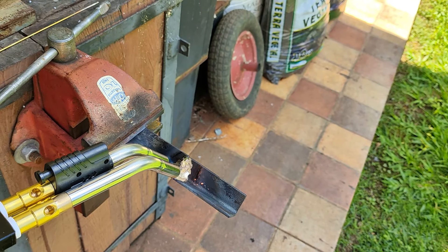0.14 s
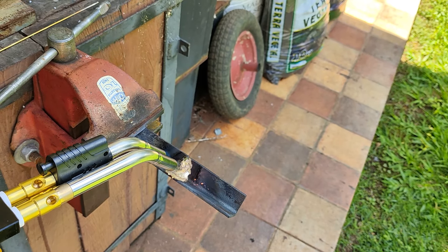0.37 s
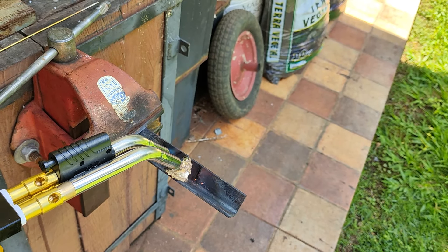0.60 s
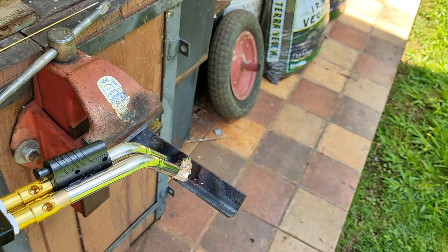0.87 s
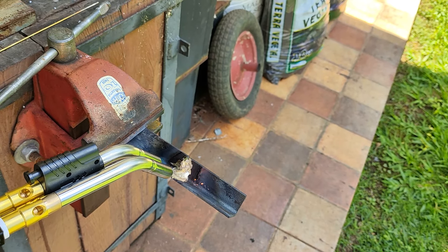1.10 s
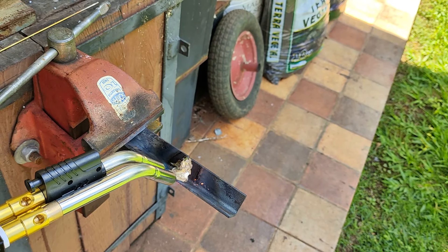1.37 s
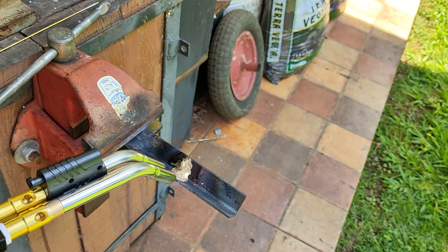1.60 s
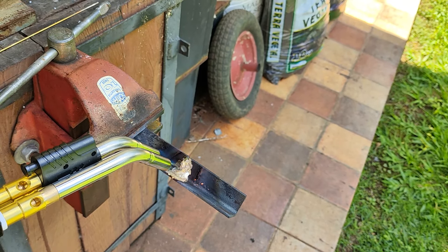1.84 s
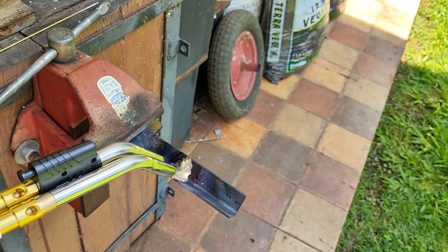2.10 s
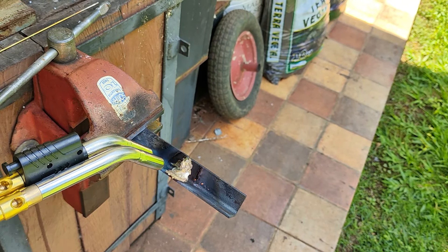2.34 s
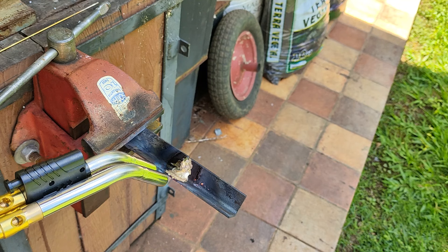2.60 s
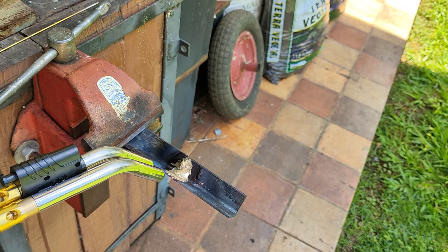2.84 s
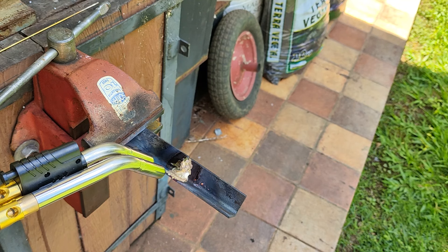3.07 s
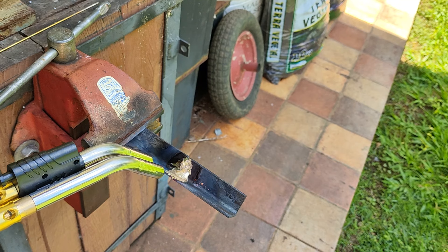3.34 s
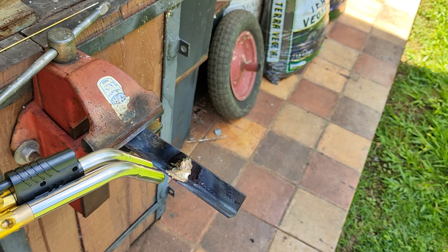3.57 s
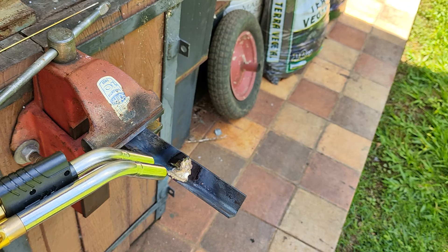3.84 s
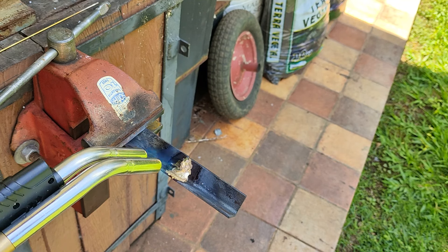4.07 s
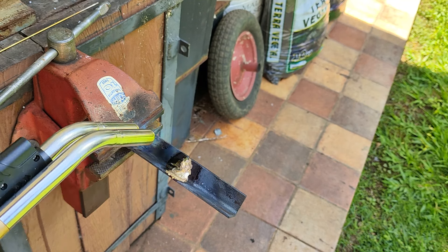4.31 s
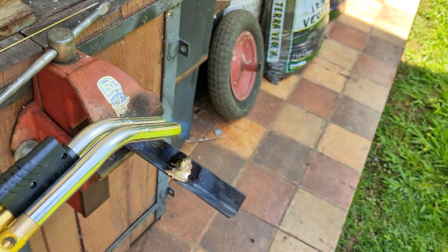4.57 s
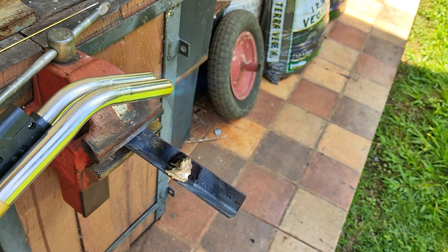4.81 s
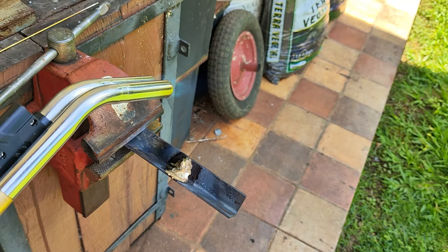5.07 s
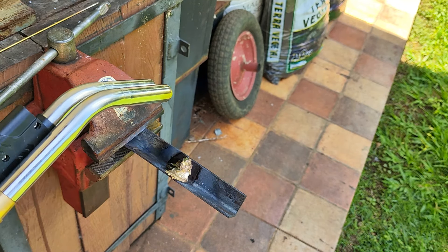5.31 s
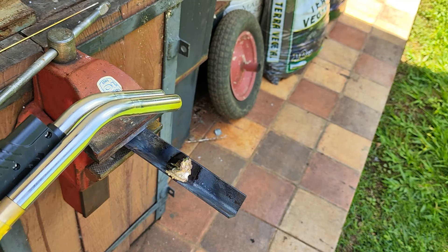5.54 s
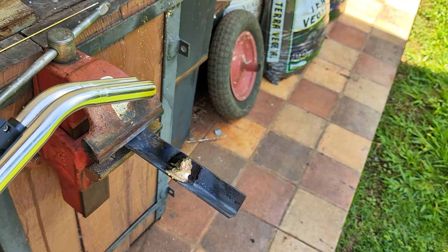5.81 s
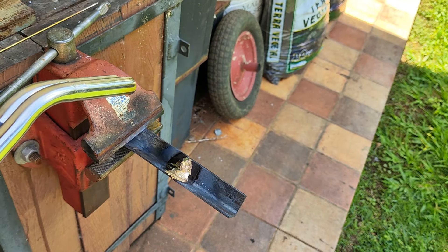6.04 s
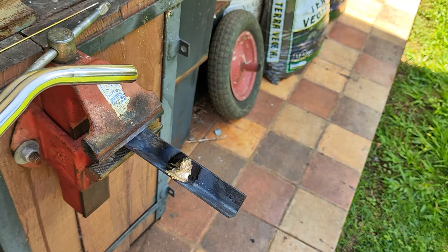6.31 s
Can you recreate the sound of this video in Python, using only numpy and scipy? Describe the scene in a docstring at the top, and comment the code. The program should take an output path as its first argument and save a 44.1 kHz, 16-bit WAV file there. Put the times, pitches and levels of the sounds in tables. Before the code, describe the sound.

From 0 s a gas torch is already burning close to a handheld stereo microphone outdoors: a loud, dense rush made of low turbulent roar, a hollow howl around 1 to 1.5 kHz, and bright jet hiss with flickering fizz. It flutters quickly but stays continuous. In the first second the treble and balance shift noticeably as the hand steers it; around 2 s the howl sinks a little, then climbs again after 3 s. Close hard surfaces give a comb-like, metallic colour that changes with movement. Near 4.1 s, as the torch lifts, a brief lower howl swells. At 5.2 s the valve closes and the flame drops away rapidly. A light, hollow ringing pop sounds at 5.4 s, a stronger thump with a metallic click at 5.65 s, with faint short reflections. Until about 6.4 s only soft distant hum, air, microphone hiss and a few tiny ticks remain.

```python
"""A gas flame roars and howls and its jet hisses: bands of fluttering noise, with a narrow wandering core in the howl.
A twin-tube torch burns close to a handheld two-port microphone, aimed at a steel bar in a vice by a shed door.
Near surfaces echo it, as delayed copies that shift with the moving torch; far walls add a faint noise tail.
The valve closes and each tube pops as its flame dies: decaying sines, a gliding ring and puffs of noise.
A quiet yard of hum, air and hiss, there all along, is left with a few faint ticks of filtered noise."""
import sys
import numpy as np
from scipy import signal
from scipy.fft import rfft, irfft, next_fast_len
from scipy.io import wavfile
from scipy.ndimage import uniform_filter1d, map_coordinates

SR = 44100
rng = np.random.default_rng(int(sys.argv[2]) if len(sys.argv) > 2 else 0)


def output_pcm(signal):
    """Save a mono or channel-first signal as 16-bit PCM at the path in sys.argv[1].

    Samples are clipped to [-1, 1] before scaling.
    """
    pcm = np.clip(np.atleast_2d(signal).T, -1, 1) * 32767
    wavfile.write(sys.argv[1], SR, np.round(pcm).astype(np.int16))


def attenuation_scalar(level_db):
    """Turn a level in dB into a linear amplitude multiplier (20 dB per decade)."""
    decades = np.asarray(level_db, float) / 20
    return 10 ** decades


N = 283122  # samples


def unit(x):
    """Scales to rms 1."""
    return x / np.sqrt(np.mean(x ** 2) + 1e-20)


def along(points, hz):
    """Reads (frequency [Hz], value) points on a log frequency axis."""
    f, v = np.transpose(points)
    return np.interp(np.log(hz + 1), np.log(f + 1), v)


def curves(rows):
    """One value per sample for each column after the time."""
    s, *columns = np.transpose(rows)
    return [np.interp(np.arange(N) / SR, s, c) for c in columns]


def wobble(rate):
    """A smooth random curve with rate knots a second."""
    knots = rng.standard_normal(int(N * rate / SR) + 4)
    return map_coordinates(knots, [np.arange(N) * rate / SR])


def smooth(x, *sizes):
    """Running means, one after another, along the last axis."""
    for size in sizes:
        x = uniform_filter1d(x, size)
    return x


def filtered(x, response):
    """Multiplies the spectrum of x by a complex response of frequency."""
    m = next_fast_len(N + 8192)
    return irfft(rfft(x, m) * response(np.fft.rfftfreq(m, 1 / SR)), m)[..., :N]


def rush(spectrum, alike, patchy_db):
    """Stereo noise of rms 1, partly shared by the ports, with eddies of random gain."""
    z = signal.stft(rng.standard_normal((2, N)), nperseg=512)[2]
    field = uniform_filter1d(rng.standard_normal(z.shape[1:]), size=3, axis=0)
    eddies = unit(uniform_filter1d(field, size=16, axis=1))
    pair = signal.istft(z * attenuation_scalar(patchy_db * eddies), nperseg=512)[1][:, :N]

    def mid_side(hz):
        turn = np.arccos(np.clip(along(alike, hz), -1, 1)) / 2  # sets the left-right likeness
        return attenuation_scalar(along(spectrum, hz)) * [np.cos(turn), np.sin(turn)]

    mid, side = filtered(pair, mid_side)
    return unit(np.array([mid + side, mid - side]))


def hiss():
    """The microphone's own hiss, nearly unrelated between the ports."""
    spectrum = [(7000, -39.0), (7600, -1.5), (11000, -0.5), (14300, 2.0)]  # (frequency [Hz], density [dB])
    return attenuation_scalar(-81.5) * rush(spectrum, [(1000, 0.0049)], patchy_db=2.0)


# likeness of the yard at the two ports: (frequency [Hz], left-right correlation)
YARD_ALIKE = [(60, .77), (290, .64), (640, .15), (1400, 0)]
# distant hum: (frequency [Hz], density [dB per Hz])
HUM = [(15, -45), (25, -24), (42, -14.5), (70, -6), (81, -7.5), (143, -6), (261, -4.5), (431, -21),
       (600, -41.5)]


def hum():
    """A low distant hum that wavers in level."""
    return attenuation_scalar(-64.5 + 2 * wobble(5)) * rush(HUM, YARD_ALIKE, patchy_db=1.7)


# far rush of air: (frequency [Hz], density [dB per Hz])
AIR = [(250, -30), (431, -2.5), (522, 0.5), (783, -0.5), (1900, -4), (2800, -5.5), (4000, -9.5),
       (5000, -16), (7600, -24), (9880, -51), (16700, -100)]


def air():
    """A nearly steady far rush of air."""
    return attenuation_scalar(-71.5 + 0.3 * wobble(8)) * rush(AIR, YARD_ALIKE, patchy_db=0.2)


def yard():
    """The quiet bed: distant hum, far air and microphone hiss added together."""
    return hum() + air() + hiss()


# faint ticks: (time [s], onset level ahead of the soft attack [dB], nominal pitch [Hz], t60 [s])
TICKS = [(5.478, -61.5, 2800, .08), (5.479, -64, 12000, .07), (5.8721, -60.5, 2400, .04),
         (5.9185, -63, 2700, .02), (5.919, -59, 10500, .014), (6.19, -71, 10000, .09)]


def ticks():
    """Brief puffs of noise in a wide band around a nominal pitch, with a soft attack and a quick decay."""
    out, t = np.zeros((2, N + SR)), np.arange(SR // 10) / SR
    for s, db, hz, t60 in TICKS:
        band = signal.butter(2, [hz * 0.45, hz * 1.8], "band", fs=SR)
        puff = unit(signal.lfilter(*band, rng.standard_normal((2, len(t)))))
        envelope = attenuation_scalar(db - 60 * t / t60) * (1 - np.exp(-t / 0.0015))
        out[:, round(s * SR):][:, :len(t)] += envelope * puff
    return out[:, :N]


# far walls of the yard: (frequency [Hz], t60 [s])
WALLS = [(300, .35), (1000, 0.59), (1300, 0.48), (1470, 0.72), (1650, .55), (2100, 0.7), (2800, .6),
         (4000, 0.37), (10000, 0.31)]


def walls(x):
    """Far walls: convolution with a noise tail in which each frequency dies at its own speed."""
    hz, t, z = signal.stft(rng.standard_normal((2, SR * 3 // 4)), SR, nperseg=256)
    decay = attenuation_scalar(-60 * t / along(WALLS, hz)[:, None])
    tail = signal.istft(z * decay, SR, nperseg=256)[1]
    return signal.fftconvolve(x, tail / np.linalg.norm(tail[0]), axes=1)[:, :N]


# flames dying in the tubes: (time [s], thump level [dB], ring level [dB],
# pitch the ring climbs towards before it sinks [Hz], ring length [s])
POPS = [(5.381, -54, -39.5, 1110, .029), (5.6516, -28.5, -36.5, 1275, .02)]
# modes of the thump: (frequency [Hz], level in the thump [dB], t60 [s])
THUMP = [(125, -12, .07), (193, 0.5, 0.054), (304, 0.5, 0.035), (433, -5, 0.022), (500, -14, 0.03),
         (650, -12, .025), (855, -14, .02)]
# metallic modes of the click: (frequency [Hz], level in the click [dB], t60 [s])
TUBE = [(1726, -3, .03), (2000, -4, .025), (2300, -4, .025), (2570, 9, .03), (2680, -5, .04),
        (4110, 2, .03), (4380, -4, 0.049), (4620, -11, .04), (5560, -17, .025)]
COOL_HZ = 1085  # where the ring settles
CLICK_DB, CRACK_DB = -21.5, -23  # relative to the thump
CATCH = 1.2  # the ring starts flat by this share of its later fall
LINGER_DB, LINGER_S = -19, 0.053  # faint last part of the ring


def modes(table, t, rise_s):
    """Decaying sines that swell in together."""
    tones = sum(attenuation_scalar(db - 60 * t / t60) * np.sin(2 * np.pi * hz * t) for hz, db, t60 in table)
    return tones * (1 - np.exp(-t / rise_s)) ** 2


def pops():
    """The flame is sucked back with a thump; the tube clicks and its air column rings, sinking as it cools."""
    out, t = np.zeros(N + SR), np.arange(SR // 5) / SR
    late = np.maximum(t - 0.0016, 0)  # click, ring and crack follow the first suck of air
    for s, thump_db, ring_db, ring_hz, ring_s in POPS:
        cooling = 1 / (1 + (late / 0.027) ** 3)
        pitch = COOL_HZ + (ring_hz - COOL_HZ) * (cooling - CATCH * np.exp(-late / 0.0037))
        fade = np.exp(-(late / ring_s) ** 2.4) + attenuation_scalar(LINGER_DB) * np.exp(-(late / LINGER_S) ** 6)
        swell = (1 - np.exp(-late / 0.0052)) * fade
        ring = attenuation_scalar(ring_db) * swell * np.sin(2 * np.pi * np.cumsum(pitch) / SR)
        rough = 1 + 1.6 * smooth(rng.standard_normal(len(t)), 40)
        click = attenuation_scalar(thump_db + CLICK_DB) * modes(TUBE, late, 0.00086) * rough
        puff = unit(smooth(rng.standard_normal(len(t)), 12, 9)) * (1 - np.exp(-late / 0.001))
        crack = attenuation_scalar(thump_db + CRACK_DB - 60 * late / 0.035) * puff
        thump = -attenuation_scalar(thump_db) * modes(THUMP, t, 0.003)  # first motion is inward
        out[round(s * SR):][:len(t)] += ring + click + crack + thump
    return np.tile(out[:N], (2, 1))


# the howl briefly sings low as the torch swings up:
# (time [s], half length [s], centre [Hz], half width [Hz], level [dB])
SURGE = (4.115, .05, 1040, 100, -27)


def surge():
    """A short swell of narrow noise."""
    s, half, centre_hz, width_hz, db = SURGE
    tone = filtered(rng.standard_normal(N), lambda hz: np.exp(-((hz - centre_hz) / width_hz) ** 2))
    return attenuation_scalar(db) * np.exp(-((np.arange(N) / SR - s) / half) ** 2) * unit(tone)


# likeness of the flame at the two ports: (frequency [Hz], left-right correlation)
SHARED = [(30, 0.4), (70, .9), (130, 1), (250, 1), (900, 1), (1500, 0.88), (3000, 0.86), (4200, 0.63),
          (5000, .55), (7000, 0.37), (14000, 0.17)]


def burning(spectrum, patchy_db):
    """Noise of the burning gas, most alike at the two ports in the low mids."""
    return rush(spectrum, SHARED, patchy_db)


# burning gas: (frequency [Hz], density [dB per Hz])
ROAR = [(20, -56), (60, -34.5), (100, -14.5), (140, -4.5), (200, -0.5), (300, 0.5), (420, -11),
        (600, -36.5)]


def roar(db, flutter):
    """Low turbulent roar of the burning gas."""
    gain_db = db + 0.5 * flutter + 0.84 * wobble(30) + 0.6 * wobble(3)
    return attenuation_scalar(gain_db) * burning(ROAR, -0.27)


# flame body: (frequency [Hz], density [dB per Hz])
BODY = [(300, -43), (420, -8.5), (650, -1), (900, -1), (1050, -15.5), (1300, -41.5)]


def body(db, flutter):
    """Mid-range body of the flame, with a slow sway."""
    gain_db = db + 0.86 * flutter + 0.6 * wobble(20) + 1.3 * wobble(3)
    return attenuation_scalar(gain_db) * burning(BODY, 0.55)


# the tightest band of the howl wanders with the torch: (time [s], centre [Hz], level over the howl noise [dB])
CORE = [(0, 1400, -7.5), (.5, 1400, -6.5), (.7, 1380, -10), (.95, 1398, -4), (1.3, 1333, -8),
        (1.7, 1303, -6.5), (2.0, 1181, -7), (2.4, 1229, -8), (2.75, 1246, -6), (3.0, 1398, -3.5),
        (3.4, 1478, -11), (3.9, 1582, -7), (4.05, 1398, -9), (4.3, 1482, -5), (4.6, 1420, -4),
        (4.9, 1400, -2), (5.2, 1380, -2.5)]
CORE_WIDE_HZ, CORE_WAVERS_HZ, CORE_SURGES_DB = 70, 80, 3


def core():
    """Narrow noise whose centre slides and wavers, in short surges."""
    centre_hz, db = curves(CORE)
    a, b = filtered(rng.standard_normal((2, N)), lambda hz: 1 / (1 + (hz / CORE_WIDE_HZ) ** 2))
    turn = 2 * np.pi * np.cumsum(centre_hz + CORE_WAVERS_HZ * wobble(9)) / SR
    return attenuation_scalar(db + CORE_SURGES_DB * wobble(14)) * unit(a * np.cos(turn) + b * np.sin(turn))


# hot tubes: (frequency [Hz], density [dB per Hz])
HOWL = [(700, -46), (900, -14), (1020, -4), (1150, -5.5), (1400, 0), (1750, -10), (2300, -35.5)]


def howl(db, flutter):
    """Howl of the hot tubes: a broad band of noise around a narrow core."""
    gain_db = db - 1.1 + 1.1 * flutter + 0.69 * wobble(18)
    return attenuation_scalar(gain_db) * (burning(HOWL, 1.0) + core())


# gas jet: (frequency [Hz], density [dB per Hz])
JET = [(1400, -35), (1750, 0), (2000, 0), (2300, 0), (3000, -3), (3700, -2), (4150, -3.5), (4450, -11.5),
       (5000, -10.5), (5400, -20), (6000, -37)]


def jet(db, flutter):
    """Upper-mid hiss of the gas jet."""
    return attenuation_scalar(db + 0.61 * flutter + 0.42 * wobble(16)) * burning(JET, 2.0)


# treble of the jet: (frequency [Hz], density [dB per Hz])
FIZZ = [(4800, -30), (5500, 1.5), (6500, 1), (7600, 0.5), (9400, -4.5), (10500, -8), (11300, -4.5),
        (12000, -1), (14300, -4)]


def fizz(db, flutter):
    """Treble fizz of the jet, flickering at several speeds."""
    gain_db = db + 0.77 * flutter + 0.47 * wobble(60) + 1.0 * wobble(7) + 0.36 * wobble(16)
    return attenuation_scalar(gain_db) * burning(FIZZ, 3.0)


# how each part answers: (level before its trims [dB], per dB of bearing [dB], per dB of facing [dB],
# per dB of gas flow [dB], per ms of retreat [dB], time over which it averages the flow [s])
PARTS = {"roar": (-34, 0.17, -0.01, .84, -2.5, 0.09), "body": (-35, 0.4, -0.05, 1.0, 8, 0.07),
         "howl": (-26, 0.98, .01, 1.25, -0.2, 0.035), "jet": (-30.5, 0.15, 0.42, 1.15, 6, 0.03),
         "fizz": (-39.8, 0.25, 1.05, .92, 0, .045)}


def levels():
    """The dB curve of each part, from hand and valve; the big slow flame averages the flow of its recent past."""
    (bearing_db, facing_db, _), back_ms = curves(HAND), curves(POSES)[0]
    t, summed = np.arange(N) / SR, np.cumsum(curves(VALVE)[0]) / SR
    out = []
    for db, bears, faces, flows, opens, slow_s in PARTS.values():
        flow_db = (summed - np.interp(t - slow_s, t, summed)) / slow_s
        out.append(db + bears * bearing_db + faces * facing_db + opens * back_ms + flows * flow_db)
    return out


# the hand steers the flame: (time [s], how hard it bears on the bar [dB],
# how far the nozzle faces the ports [dB], lean of the jet to the left, ahead of its 0.8 scaling [dB])
HAND = [(0, 0, -4.5, 0), (.26, 0, 0, 1.5), (.45, -2, -3.5, -5.5), (.54, 1.5, -1, -5), (.62, -4.5, -5, -4.5),
        (.72, -3, -8, -5.5), (.8, 1, -2, -4), (.95, 1, -0.5, -2.5), (1.1, 2, 1, -1.5),
        (1.45, 1, -1.5, -1.5), (2.0, 0, -1.5, -1), (2.2, .5, 0.5, -2.5), (2.5, 0.5, 0.5, -1.5),
        (2.95, -1, 0, 1.5), (3.4, -0.5, 2.5, 0.5), (3.6, -.5, -1.5, -0.5), (4.02, -1, 2.5, -1),
        (4.17, -1.5, 0.5, -1.5), (4.5, -0.5, 2, -.5), (4.7, 1, -0.5, -0.5), (4.9, 2, -1, -1.5),
        (5.18, -1, -1, 0.5)]
# the valve closes: (time [s], gas flow [dB])
VALVE = [(5.2, 0), (5.275, -4.5), (5.305, -8.5), (5.332, -19), (5.375, -29), (5.41, -35), (5.45, -50),
         (5.6, -85)]


def flame():
    """Turbulent burning: all parts flutter together, each also on its own."""
    roar_db, body_db, howl_db, jet_db, fizz_db = levels()
    flutter = 0.6 * wobble(11) + 0.2 * wobble(23.72) + 0.5 * wobble(150)
    lean = attenuation_scalar(np.outer([0.4, -0.4], curves(HAND)[-1]))
    hot = roar(roar_db, flutter) + body(body_db, flutter) + howl(howl_db, flutter)
    gas = lean * (jet(jet_db, flutter) + fizz(fizz_db, flutter))
    lit = np.arange(N) < VALVE[-1][0] * SR
    return lit * (hot + gas)


# shading by the casing: (frequency [Hz], right over left [dB])
RIGHT = [(100, -.5), (700, 0.5), (1200, 0.5), (3300, 1.5), (5500, -1.5), (9000, -5.5), (14000, 0.5)]


def ports(hz, lead_ms):
    """Sound from the left reaches the left port first; the casing shades each port in its own way."""
    half = attenuation_scalar(along(RIGHT, hz) / 2) * np.exp(-1j * np.pi * hz * lead_ms / 1000)
    return np.array([1 / half, half])


def echo(rows, hz, later_ms):
    """Sum of delayed copies, each with its own delay and gain at either port."""
    total = 0
    for left_ms, right_ms, left, right in rows:
        delay_ms = np.c_[later_ms + np.array([left_ms, right_ms])]
        total = total + np.c_[[left, right]] * np.exp(-2j * np.pi * hz * delay_ms / 1000)
    return total


# the hand holds the torch in a new place: (time [s], retreat from vice and door [ms],
# rise over the tiles [ms], lift of the lower howl [dB], strength of the bar's echo [factor])
POSES = [(.38, 0.031, 0.0077, -1.5, .9), (1.12, 0, 0, -1, 0.41), (1.85, 0.0069, 0.031, 2, 0.93),
         (2.55, 0.028, 0.065, 3, 1.2), (3.2, 0.048, 0.05, -2, 1.1), (3.82, 0.074, 0.1, -1, 1.7),
         (4.1, 0.18, .26, 3, 0.92), (4.6, .18, 0.29, -0.5, 0.64), (4.88, 0.26, 0.68, -1, 0.4)]
# echoes off vice and door, then off the bar, then off the tiles, before retreat and rise delay them:
# (delay left [ms], delay right [ms], gain left [factor], gain right [factor])
ECHOES = [(1.27, 1.45, -0.091, -.13), (2.12, 2.38, -0.16, -0.13), (2.48, 2.75, .24, .2),
          (2.88, 3.16, -0.11, -0.09), (5.3, 5.36, -0.028, -.08)]
BAR = (1.69, 1.883, 0.17, .25)
TILES = [(3.79, 3.7, .18, .32), (4.08, 3.85, -.13, -0.2), (4.3, 4.02, 0.066, 0.073),
         (4.69, 4.8, 0.031, 0.17)]
# a bright band of the jet tends to climb as the torch lifts away: (time [s], centre [Hz], level [dB])
FOCUS = [(.38, 3560, 1), (1.12, 3600, 2.5), (1.85, 3600, -2), (2.55, 3520, 3), (3.2, 3580, 1),
         (3.82, 3640, 4), (4.1, 3760, 4.5), (4.6, 3770, 5), (4.88, 4000, 2.5)]
# narrow bands that sink or rise with the torch's place: (centre [Hz], half width [Hz],
# level close to the vice [dB], level drawn back [dB], added per strength of the bar's echo [dB])
HOLLOWS = [(420, 40, -4, 1, 0), (790, 75, 1, -1, 0), (1560, 110, -0.5, -2, 0), (1820, 110, -1, 3.5, 0),
           (3330, 82, -3, -0.5, -1), (4020, 150, -1, -0.5, 0), (4660, 100, 3, -1, -4.5),
           (5380, 100, -4.5, 1.5, 0)]
BAR_SLIDE_MS, BAR_SETTLES_MS = (0.25, 0.087), 0.035  # bar echo slips later, left and right, early in the retreat
TILES_FADE_MS = 1.2  # rise over which the tile echo weakens to 1/e
DRAWN_BACK_MS, FOCUS_WIDE_HZ = 0.2, 159.6
SEESAW = 0.34  # the upper howl gains this many dB for each dB the lower one loses
LEAD_MS, LEAD_GROWS = 0.13, 0.13  # lead of the left port, and its growth per ms of retreat


def bell(hz, centre_hz, width_hz):
    """A smooth bump in frequency."""
    return np.exp(-((hz - centre_hz) / width_hz) ** 2)


def place(hz, pose):
    """Response of one pose: near echoes comb the sound, coming later as the torch draws back and rises."""
    s, back_ms, rise_ms, lift_db, bar = pose
    times, focus_hz, focus_db = np.transpose(FOCUS)
    focus_hz, focus_db = np.interp(s, times, focus_hz), np.interp(s, times, focus_db)
    away = np.tanh((back_ms / DRAWN_BACK_MS) ** 2)
    slide_ms = np.multiply(BAR_SLIDE_MS, np.tanh(back_ms / BAR_SETTLES_MS))
    near = echo(ECHOES, hz, back_ms) + bar * echo([BAR], hz, slide_ms)
    near = near + np.exp(-rise_ms / TILES_FADE_MS) * echo(TILES, hz, rise_ms)
    dull = 1 / (1 + (hz / 5500) ** 2)  # rough surfaces scatter the treble
    # the tubes point more or less at the ports
    tilt_db = lift_db * (bell(hz, 1160, 150) - SEESAW * bell(hz, 1430, 120))
    bands_db = focus_db * bell(hz, focus_hz, FOCUS_WIDE_HZ)
    for mid, wide, close, far, per_bar in HOLLOWS:
        bands_db = bands_db + (close + away * (far - close) + bar * per_bar) * bell(hz, mid, wide)
    return attenuation_scalar(bands_db + tilt_db) * (1 + dull * near) * ports(hz, LEAD_MS + LEAD_GROWS * back_ms)


def surfaces(x):
    """The torch moves: its sound crossfades from the response of one pose to the next."""
    times, out = [pose[0] for pose in POSES], np.zeros_like(x)
    for share, pose in zip(np.eye(len(POSES)), POSES):
        fade = np.interp(np.arange(N) / SR, times, share)
        out += fade * filtered(x, lambda hz: place(hz, pose))
    return out


def scene():
    """Torch among its surfaces, in the yard."""
    torch = surfaces(flame() + surge() + pops())
    return torch + attenuation_scalar(-27.0) * walls(torch) + ticks() + yard()


# response of the ports: (frequency [Hz], gain [dB])
PORT = [(7500, 0.5), (7900, -2), (8100, -13.5), (8350, -17), (8600, -12.5), (8850, -3), (9080, -6),
        (9350, 0.5), (12500, -0.5), (14000, 7.5), (14300, 3.5)]
TOP_HZ = 14258  # band limit


def port_tone(x):
    """The ports lose a narrow band of treble and lift the top; nothing passes above the band limit."""
    return filtered(x, lambda hz: attenuation_scalar(along(PORT, hz)) * (hz < TOP_HZ))


def roll_off(x):
    """The treble ends steeply here."""
    return signal.sosfilt(signal.butter(12, 15620, fs=SR, output="sos"), x)


def record(dry):
    """The scene as heard through the microphone's two ports."""
    heard = port_tone(dry)
    return roll_off(heard)


dry = scene()
out = record(dry)
output_pcm(out)
```